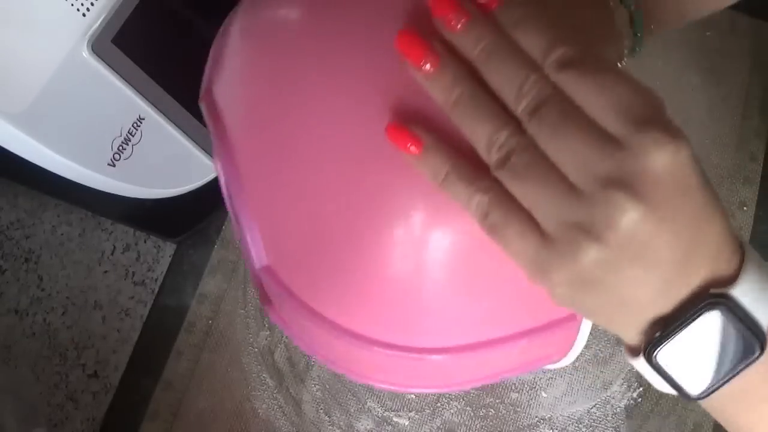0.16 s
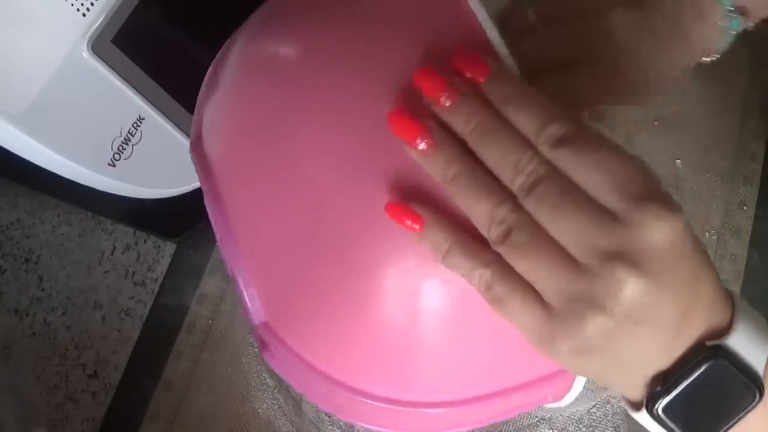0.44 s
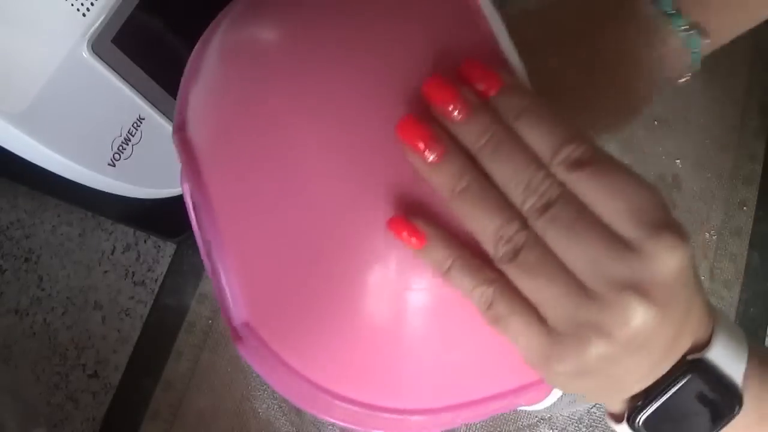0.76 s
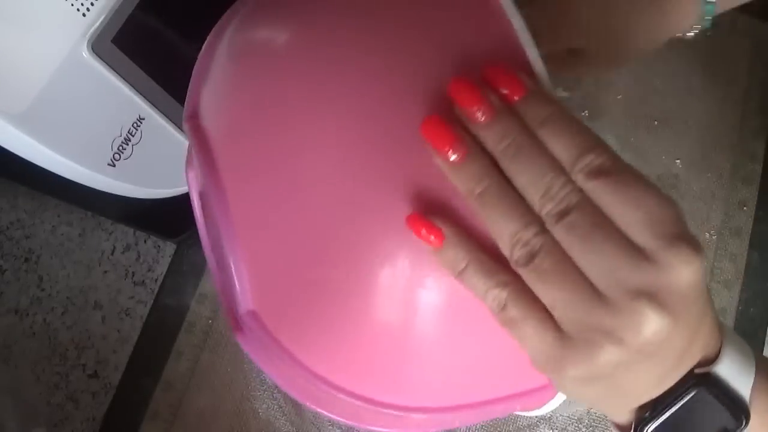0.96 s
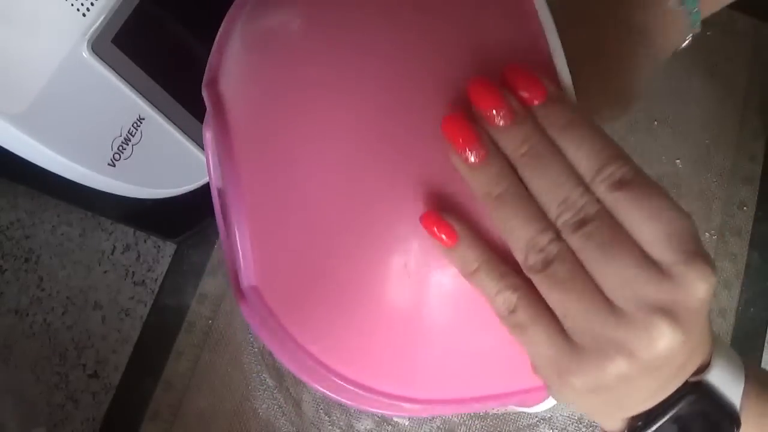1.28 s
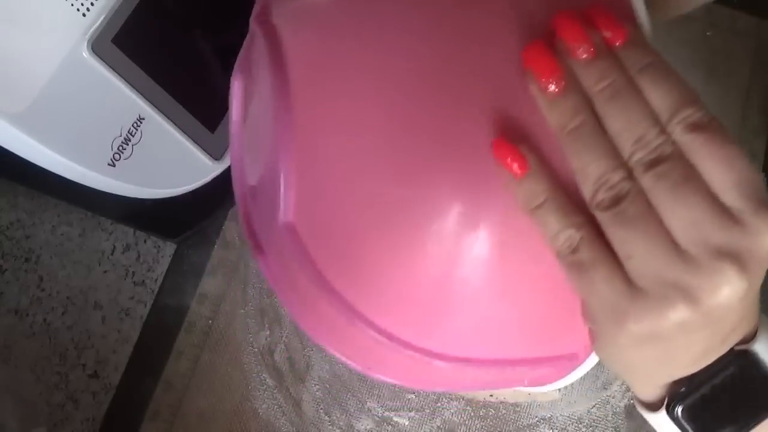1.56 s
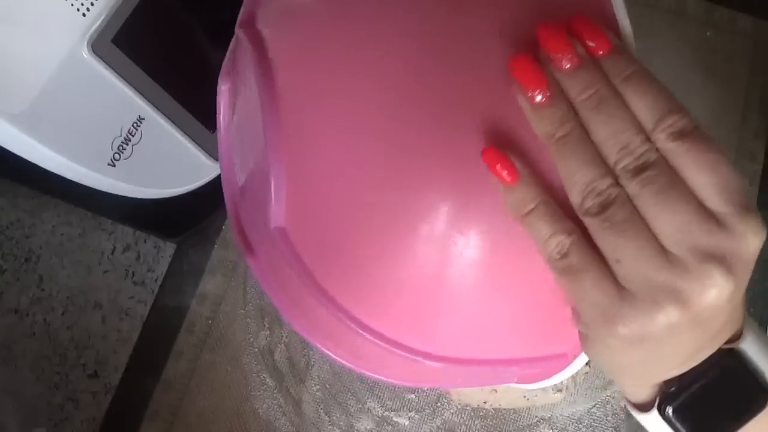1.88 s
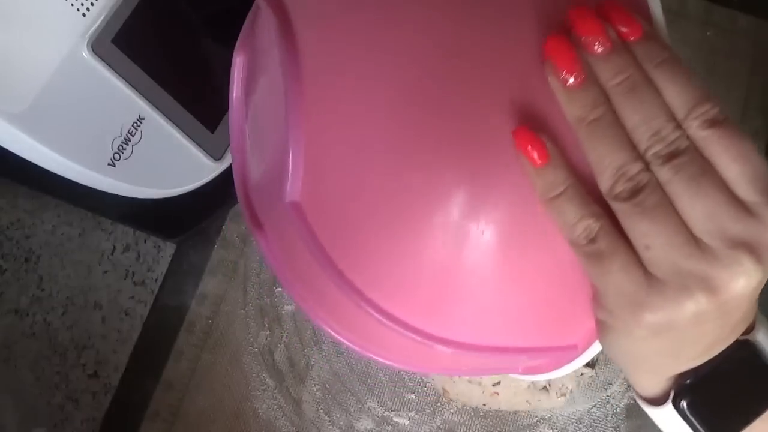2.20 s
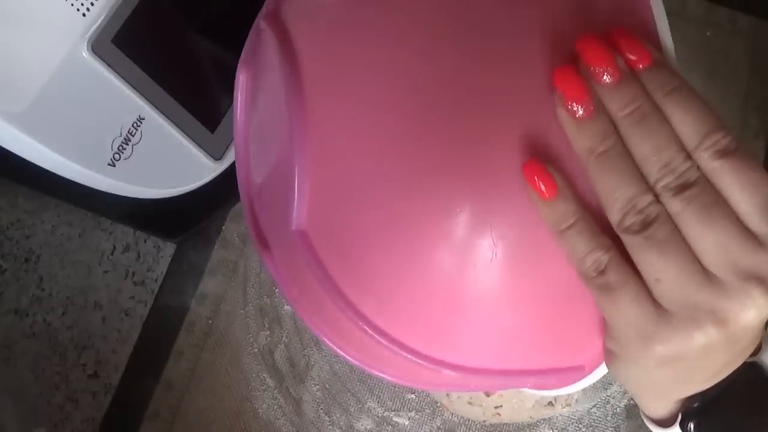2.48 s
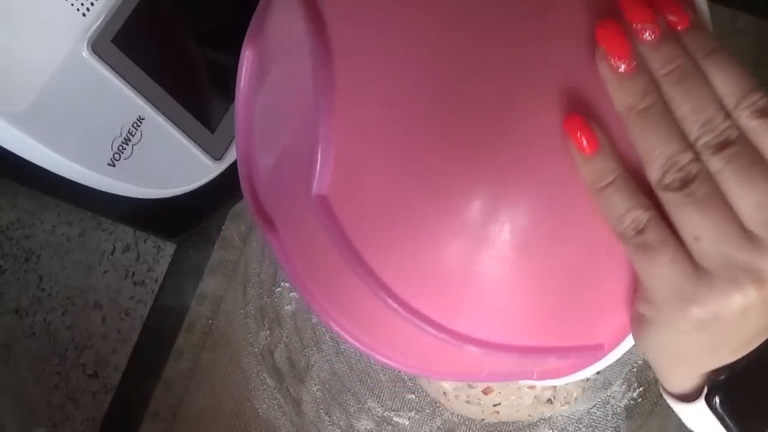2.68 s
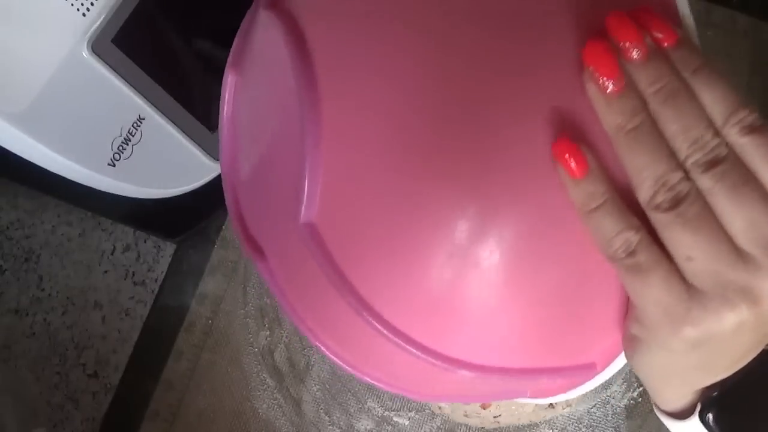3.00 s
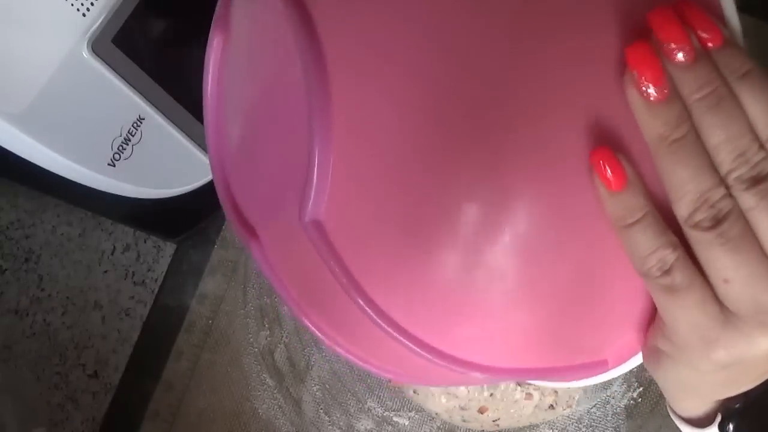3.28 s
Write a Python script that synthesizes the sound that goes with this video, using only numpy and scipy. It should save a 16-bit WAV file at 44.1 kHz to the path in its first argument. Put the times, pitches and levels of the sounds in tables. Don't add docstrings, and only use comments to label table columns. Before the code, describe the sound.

Hollow plastic slaps, nine pats of a hand on an upturned bowl, with skin rubbing between.

```python
import sys
import numpy as np
from scipy import signal
from scipy.io import wavfile
from scipy.ndimage import uniform_filter1d

SR = 44100
rng = np.random.default_rng(int(sys.argv[2]) if len(sys.argv) > 2 else 0)


def gain_from_db(level_db):
    decades = np.asarray(level_db, float) / 20
    return 10 ** decades


def store_pcm(level_fs):
    pcm = np.round(np.clip(level_fs, -1, 1) * 32767).astype(np.int16)
    wavfile.write(sys.argv[1], SR, np.atleast_2d(pcm).T)


N = 152145


def evened(x):
    return x / np.sqrt(np.mean(x ** 2) + 1e-20)


def smooth_drift(size):
    drift = uniform_filter1d(rng.standard_normal(N), size=size)
    return evened(uniform_filter1d(drift, size=size))


def read(points, hz):
    f, value = np.transpose(points)
    return np.interp(np.log(hz + 1), np.log(f + 1), value)


def follow(points):
    times, values = np.transpose(points)
    return np.interp(np.arange(N) / SR, times, values)


def add(mix, start_s, sound):
    part = mix[round(start_s * SR):][:len(sound)]
    part += sound[:len(part)]


def band(x, hz, kind):
    return signal.sosfilt(signal.butter(2, hz, kind, fs=SR, output="sos"), x)


def causal(points):
    log_gain = np.log(gain_from_db(read(points, abs(np.fft.fftfreq(4096, 1 / SR)))))
    taps = np.fft.ifft(np.exp(np.conj(signal.hilbert(log_gain)))).real[:2048]
    return taps / np.linalg.norm(taps)


def ringing(modes, detune=0, scatter_db=0):
    longest_s = 0.04
    t = np.arange(3000) / SR
    ring = np.zeros(len(t))
    for k, (hz, db, t60) in enumerate(modes):
        pitch_luck, level_luck = rng.standard_normal(2)
        level = gain_from_db(db + scatter_db * level_luck - 60 * t / min(t60, longest_s))
        tone = np.sin(2 * np.pi * hz * (1 + detune * pitch_luck) * t)
        ring += (-1) ** k * level * tone
    return ring / np.linalg.norm(ring)


# pitch_hz, likeness (0 to 1)
STEREO_LIKENESS = [(60, 0.81), (220, 0.92), (800, 0.45), (2930, 0.41), (10700, 0.32)]


def hiss(points, patch_db):
    frames, hz = N // 256 + 5, np.fft.rfftfreq(1024, 1 / SR)
    a, b, c, d, patches = rng.standard_normal((frames, 513, 5)).T
    patches = uniform_filter1d(patches, size=40, axis=0)
    patches = evened(uniform_filter1d(patches, size=8, axis=1))
    same = np.clip(read(STEREO_LIKENESS, hz), -1, 1)[:, None]
    left = a + 1j * b
    right = same * left + np.sqrt(1 - same ** 2) * (c + 1j * d)
    z = np.array([left, right]) * gain_from_db(read(points, hz)[:, None] + patch_db * patches)
    return evened(signal.istft(z, nperseg=1024, noverlap=768)[1][:, :N])


# time_s, level_db
HUM_LEVEL = [(0.0, -66), (0.58, -64), (0.85, -61.5), (1.5, -57), (1.62, -62), (1.8, -65), (1.9, -78),
             (2.03, -68), (3.45, -76)]
# multiple of the turning speed, level_db
HUM_ORDERS = [(1, 1), (2, -14), (4, -13), (8, -14.5)]


def fridge():
    speed_hz, wobble_hz = 61, 0.4
    turns = np.cumsum(speed_hz + wobble_hz * smooth_drift(4000)) / SR
    hum = sum(gain_from_db(db) * np.sin(2 * np.pi * k * turns) for k, db in HUM_ORDERS)
    return np.sqrt(2) * gain_from_db(follow(HUM_LEVEL)) * hum


# pitch_hz, level_db (per Hz)
AIR_COLOUR = [(25,-14.5),(60,-2.5),(130,-17.5),(290,-4),(570,-8),(1030,-12.5),(3000,-17),(11000,-24.5)]


def air():
    level_db = -59.5
    return gain_from_db(level_db) * hiss(AIR_COLOUR, 1.5)


# time_s, level_db
RUSTLE_LEVEL = [(0.0, -53), (0.84, -56.5), (0.95, -60), (2.49, -57.5), (3.45, -99)]
# pitch_hz, level_db
RUSTLE_COLOUR = [(300, -1), (1000, -6), (3000, -11), (6000, -10), (11000, -16)]


def rustle():
    flicker_db = 1.5 * smooth_drift(500)
    return gain_from_db(follow(RUSTLE_LEVEL) - 2 + flicker_db) * hiss(RUSTLE_COLOUR, 1.5)


# start_s, level_db, pitch_hz, length_s
BUMPS = [(0.0,-59.5,390,0.098),(1.64,-41.5,280,0.06),(1.705,-51.5,302,0.1),(0.141,-49,200,0.041),(0.149,-59,120,0.043),(0.6,-47.5,130,0.023),(0.652,-46,227,0.073),(.68,-51.5,118,0.034),(0.668,-60,35,0.056),
         (1.187,-48,45.7,0.035),(1.896,-57.5,500,0.069),(2.115,-56,97,0.12),(2.251,-61.5,107,0.094),(2.802,-65,40,0.049),(2.524,-44.5,450,0.059),
         (2.842,-43.5,380,0.058),(3.071,-53,45.3,0.053),(3.105,-39,550,0.039),(3.375,-49.5,554,0.044)]


def bumps():
    out = np.zeros(N)
    for start, db, hz, length in BUMPS:
        t = np.arange(0, length, 1 / SR)
        thud = rng.standard_normal(SR // 4)
        for _ in range(2):
            thud = band(thud, 1.3 * hz, "low")
            thud = band(thud, 0.75 * hz, "high")
        thud = evened(thud[-len(t):])
        add(out, start, gain_from_db(db) * np.sin(np.pi * t / length) ** 2 * thud)
    return out


# pitch_hz, level_db, t60_s
TICK_MODES = [(2445, -1, 0.081), (2760, 1, 0.022), (3464, 0, 0.036), (4540, -8, 0.032)]


def fan():
    first_s, ticks_per_s, level_db = 0.015, 25, -58
    at = np.arange(first_s, N / SR, 1 / ticks_per_s)
    train = np.zeros(N)
    train[(at * SR).astype(int)] = gain_from_db(2.0 * rng.standard_normal(len(at)))
    return gain_from_db(level_db + 20.5) * signal.fftconvolve(train, ringing(TICK_MODES))[:N]


# pitch_hz, level_db, t60_s
SHELL_MODES = [(249, -6.5, 0.06), (288, -22, 0.036), (500, -1.5, 0.057), (635, -6.5, 0.045),
               (938, -0.5, 0.05), (1062, 4, 0.017), (1195, -6, 0.05), (1262, -9, 0.045),
               (1494, -15.5, 0.05), (1576, -2, 0.032), (1717, -17.5, 0.045), (2108, -1.5, 0.04),
               (2370, -5, 0.011), (2857, 5, 0.027)]
# pitch_hz, level_db
SKIN_COLOUR = [(59, -65), (100, -15.5), (267, -11), (473, -6), (1310, -5), (1840, -5), (3380, -3.5),
               (8350, -17.5), (11000, -25), (14300, -124), (22000, -120)]


def bowl(force):
    skin_db, ring_db = -2, -4
    slap = signal.fftconvolve(force, causal(SKIN_COLOUR))
    modes = ringing(SHELL_MODES, detune=0.015, scatter_db=6)
    ring = signal.fftconvolve(force, modes)[:len(slap)]
    return gain_from_db(skin_db) * slap + gain_from_db(ring_db) * ring


def tinted(x, crack_db, thump_db=0):
    crack = x - band(x, 3140, "low")
    thump = band(x, 450, "low")
    return x + (gain_from_db(crack_db) - 1) * crack + (gain_from_db(thump_db) - 1) * thump


# start_s, level_db, crack_db, thump_db
BLOWS = [(0.1368, -10.5, 9, 19.5), (0.139, -9.5, 11.5, 16), (0.145, -30, 6, 7), (0.171, -13.5, 7, -3),
         (0.257, -24, -10, -8), (0.269, -28, -7, -7), (0.603, -14, 0.5, 7), (0.649, -7, 0, 7.5),
         (1.139, -15.5, 0.5, 12.5), (1.183, -7.5, 1, 7), (1.635, -9, 6, -3), (1.661, -17, -3, -2.5),
         (2.0446, -13.5, 3.5, 10.5), (2.054, -22.5, 2, 1), (2.062, -30, 21, 0), (2.08, -24, 4, 3),
         (2.404, -15, 0.5, 5), (2.4097, -14.5, 7.5, -11), (2.434, -21.5, 7, -9), (2.444, -19.5, 8, 4),
         (2.483, -29.5, -13, 13), (2.5107, -27, 1, 7), (2.744, -25, -20, -5), (2.747, -14.5, 0, 7.5),
         (2.758, -12.5, 8, -16), (2.852, -30.5, -5, -5), (3.013, -21.5, -1.5, -22), (3.036, -29, -7, -5),
         (3.048, -21, -5, -5), (3.063, -20, -1.5, -11), (3.074, -21, 6, -9), (3.0755, -9, -3.5, 11),
         (3.086, -19, -8, 22), (3.296, -22, -8, 12.5), (3.309, -21.5, -8, -7), (3.3156, -19.5, -1.5, -8),
         (3.332, -16, -9, -3), (3.335, -13, -6, -16), (3.3394, -12, -1.5, 3.5), (3.3474, -21, -10, -3)]


def blows():
    level_db, contact_s, chatter_t60_s, snap = -6.5, 0.00035, 0.05, 9
    out, t = np.zeros(N), np.arange(0, 0.06, 1 / SR)
    for start, db, crack_db, thump_db in BLOWS:
        chatter = rng.standard_normal(len(t)) * gain_from_db(-60 * t / chatter_t60_s)
        push = 4 * np.exp(-(t / contact_s) ** 2) * np.cos(np.pi * t / contact_s)
        sound = tinted(bowl(push + chatter + snap * (t == 0)), crack_db, thump_db)
        sound /= np.sqrt(np.mean(sound[:200] ** 2))
        add(out, start + 0.0008, gain_from_db(db + level_db) * sound)
    return out


# start_s, length_s, first_pressure_db, last_pressure_db, dryness_db
DRAGS = [(0.142,0.036,-30,-41,5.5),(0.176,0.046,-30,-31,4.5),(0.216,0.036,-29,-28.5,-8),(0.262,0.038,-47,-62,-7),
         (0.611,0.043,-30.5,-48.5,-21),(0.653,0.058,-35,-26.5,1.5),(0.694,0.038,-33,-27,-10.5),(0.739,0.052,-49,-61,1),
         (1.142,0.065,-32,-26.5,-3.5),(1.185,0.032,-18.5,-46,-2.5),(1.231,0.1,-46,-64,1),
         (1.636,0.028,-20,-26.5,1.5),(1.673,0.13,-39.5,-55.5,2),(2.049,0.036,-22.5,-28,-2),(2.092,.13,-38,-49,-5),
         (2.412,0.039,-25,-32,-11.5),(2.464,0.029,-37.5,-44,-3.5),(2.482,0.082,-34,-52,-1.5),(2.752,0.024,-34,-25,-3.5),(2.787,0.076,-37.5,-37.5,-0.5),
         (3.02,0.055,-46,-26.5,-13),(3.077,0.068,-40,-46.5,-6),(3.297,0.033,-31,-32.5,-11),(3.337,0.02,-24,-49,-25),(3.358,0.07,-62,-54,-6)]


def drags():
    level_db, slips_per_s, spread_db, dulling_db, lift_s = 1.5, 4000, 2.5, -3, 0.013
    out = np.zeros(N)
    for start, length, first_db, last_db, dry_db in DRAGS:
        size_db = spread_db * np.minimum(rng.exponential(1, SR // 4), 4)
        size = gain_from_db(size_db) * rng.standard_normal(SR // 4)
        slips = size * (rng.random(SR // 4) < slips_per_s / SR)
        t = np.arange(0, length + 4 * lift_s, 1 / SR)
        progress = t / length
        fade = np.minimum(t / 0.0013, 1) * gain_from_db(-20 * np.maximum(t - length, 0) / lift_s)
        rub = evened(bowl(slips))[3000:3000 + len(t)]
        rub = tinted(rub, dry_db + dulling_db * (progress - 0.5))
        pressure_db = first_db + (last_db - first_db) * progress
        add(out, start, fade * gain_from_db(level_db + pressure_db) * rub)
    return out


# time_s, pitch_hz
FLEX = [
    [(.136, 1020), (.165, 1160), (.173, 2020), (.182, 1290), (.203, 960), (.225, 1360), (.25, 1040),
     (.275, 980), (.32, 930)],
    [(.6, 1480), (.642, 1300), (.655, 1160), (.68, 1400), (.712, 1680), (.75, 1090), (.8, 1300)],
    [(1.138, 1260), (1.176, 1430), (1.19, 1510), (1.23, 1290)],
    [(1.636, 1270), (1.662, 1700), (1.7, 1180), (1.74, 1620), (1.8, 980)],
    [(2.045, 1490), (2.06, 1730), (2.09, 1660), (2.13, 1620), (2.175, 1160), (2.22, 1450)],
    [(2.404, 1100), (2.413, 1780), (2.428, 1920), (2.445, 1610), (2.495, 1670), (2.52, 1350), (2.56, 1000)],
    [(2.747, 1150), (2.762, 1840), (2.8, 1500), (2.862, 1500)],
    [(3.014, 920), (3.035, 1200), (3.05, 1370), (3.078, 1590), (3.1, 1140), (3.15, 1070)],
    [(3.296, 1500), (3.32, 1570), (3.336, 1530), (3.345, 1400), (3.38, 1380), (3.43, 1510)],
]


def flexed(x):
    width_hz, flex_db, rest_db = 850, 6, -5
    turn = np.exp(2j * np.pi * np.cumsum(follow(np.concatenate(FLEX))) / SR)
    r = np.exp(-np.pi * width_hz / SR)
    sung = turn * signal.lfilter([(1 - r) ** 2], [1, -2 * r, r * r], x / turn)
    return gain_from_db(rest_db) * x + gain_from_db(flex_db) * sung.real


# start_s, level_db
CRUMBS = [(0.3654, -55), (0.414, -40), (0.831, -41.5), (0.856, -40.5), (1.305, -38), (1.3936, -43.5),
          (1.483, -40.5), (2.162, -39), (2.273, -42.5), (2.5893, -40.5), (2.6364, -43), (2.702, -52),
          (3.1326, -36.5)]


def crumbs():
    out, t = np.zeros(N), np.arange(0, 0.03, 1 / SR)
    for start, db in CRUMBS:
        crackle = band(rng.standard_normal(len(t)), 2900, "high")
        add(out, start, gain_from_db(db - 9.5 - 60 * t / 0.073) * crackle)
    return out


# pitch_hz, t60_s
KITCHEN_DECAY = [(200,0.18),(1000,0.17),(4000,0.18),(10000,0.15)]


def kitchen(x):
    width_db, wide_hz = -7, 3920
    taps = np.zeros((2, SR // 2))
    at = np.arange(100, SR // 2 - 20, 20) + rng.integers(0, 20, (2, (SR // 2 - 101) // 20))
    np.put_along_axis(taps, at, rng.choice([-1., 1.], at.shape), 1)
    hz, t, z = signal.stft(taps, SR, nperseg=256)
    z = z * gain_from_db(-60 * t / read(KITCHEN_DECAY, hz)[:, None])
    echoes = signal.istft(z, SR, nperseg=256)[1]
    echoes = echoes / np.linalg.norm(echoes[0])
    middle, spread = signal.fftconvolve(x[None], echoes, axes=1)[:, :N]
    side = gain_from_db(width_db) * band(spread, wide_hz, "high") + gain_from_db(-5.5) * spread
    return middle + np.array([side, -side])


def scene():
    wet_db, left_db = -10, 0.4
    patted = band(flexed(blows() + drags()), 115, "high")
    near = patted + bumps() + crumbs() + fan()
    close = np.array([np.roll(near, 1), near])
    around = air() + rustle() + fridge()
    return (close + gain_from_db(wet_db) * kitchen(near) + around) * gain_from_db([[left_db], [-left_db]])


def low_pass(x):
    return signal.sosfilt(signal.butter(12, 11320, fs=SR, output="sos"), x)


# start_s, length_s, above_hz
HOLES = [(.122,.011,700),(.587,.011,150),(.633,.014,5000),(1.121,.015,600),(1.168,.011,6500),(2.029,.012,150),(2.396,.006,5000),(3.001,.009,150),(3.281,.011,150)]


def record(dry):
    t, kept = np.arange(N) / SR, dry
    for start, length, hz in HOLES:
        hole = np.clip(np.minimum(t - start, start + length - t) / 0.002 + 0.5, 0, 1)
        high_pass = signal.butter(4, hz, "high", fs=SR, output="sos")
        kept = kept - 0.97 * hole * signal.sosfiltfilt(high_pass, kept)
    edge_hz = 11120
    taps = signal.firwin(511, edge_hz, window=("kaiser", 4), fs=SR)[None]
    return low_pass(signal.oaconvolve(kept, taps, "same"))


dry = scene()
out = record(dry)
store_pcm(out)
```